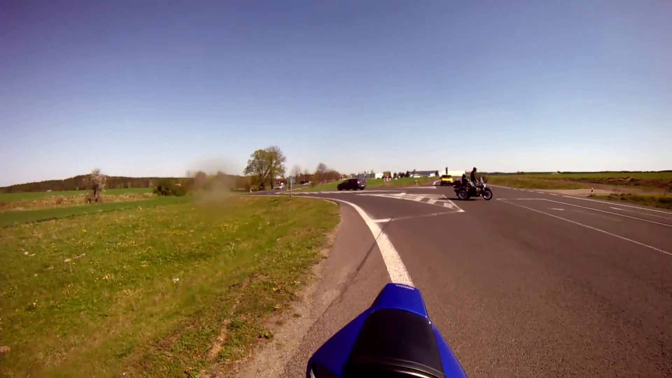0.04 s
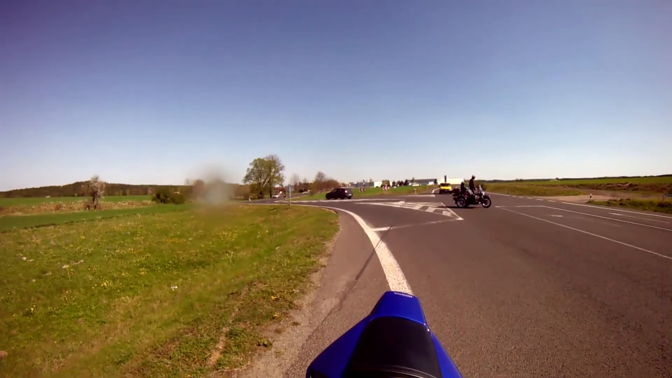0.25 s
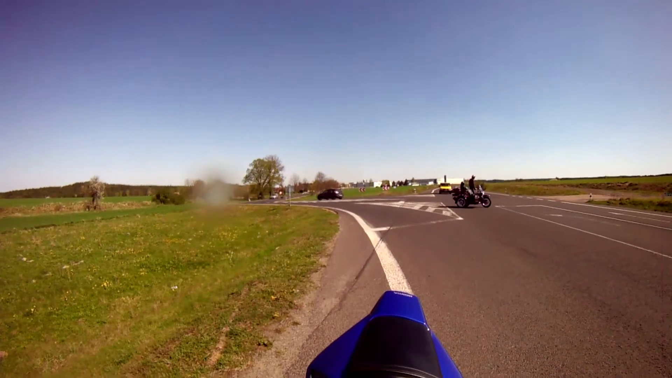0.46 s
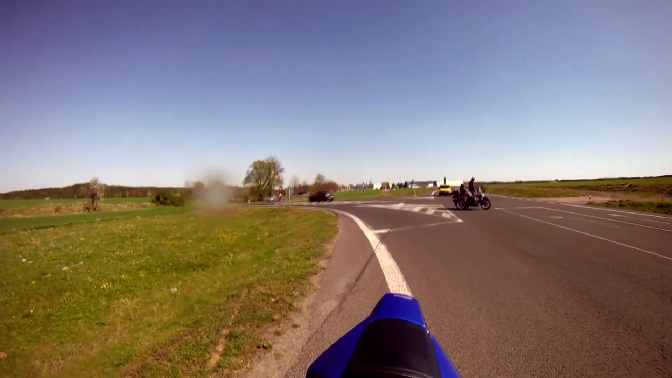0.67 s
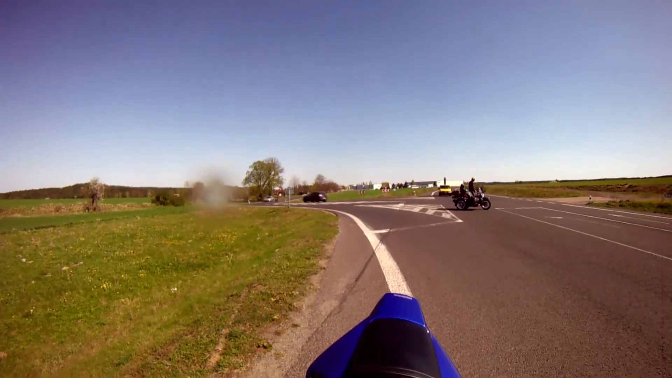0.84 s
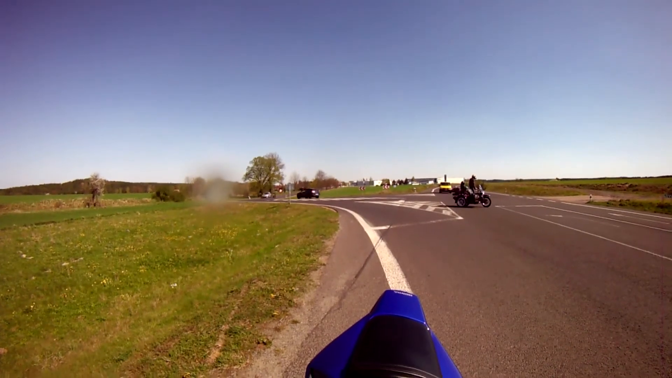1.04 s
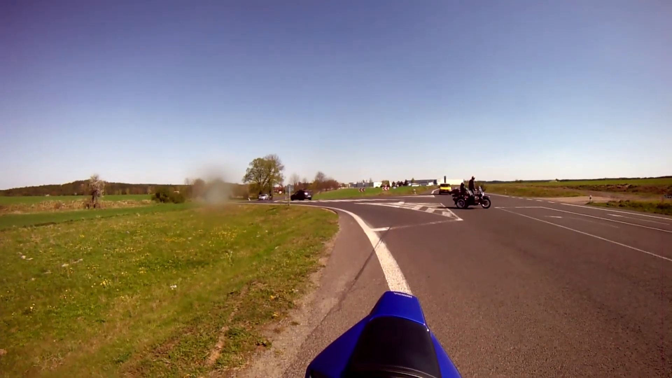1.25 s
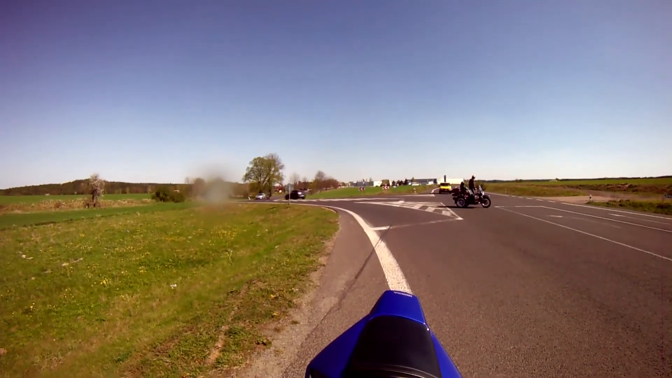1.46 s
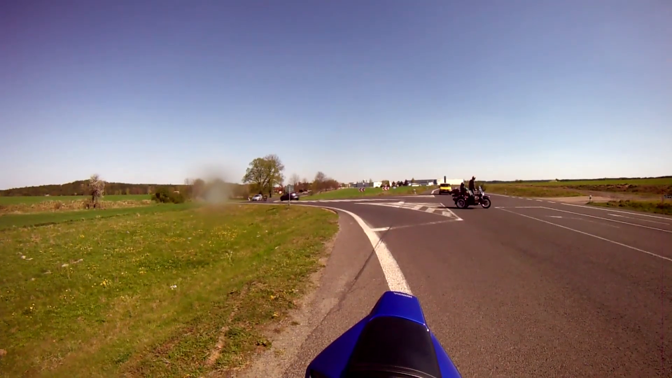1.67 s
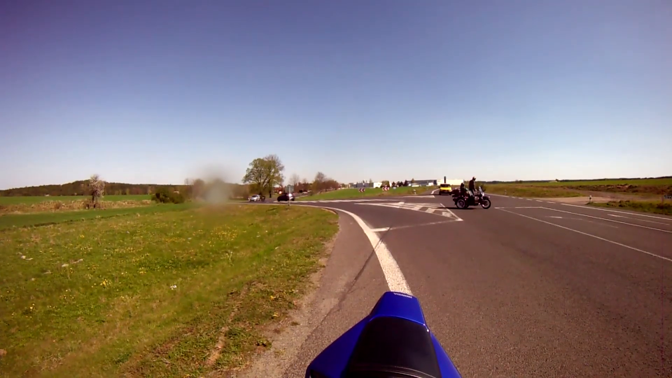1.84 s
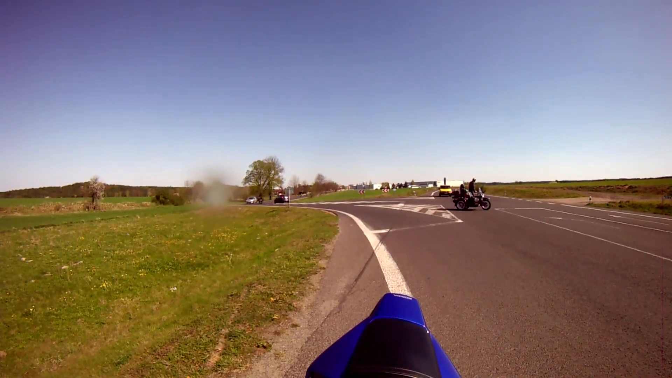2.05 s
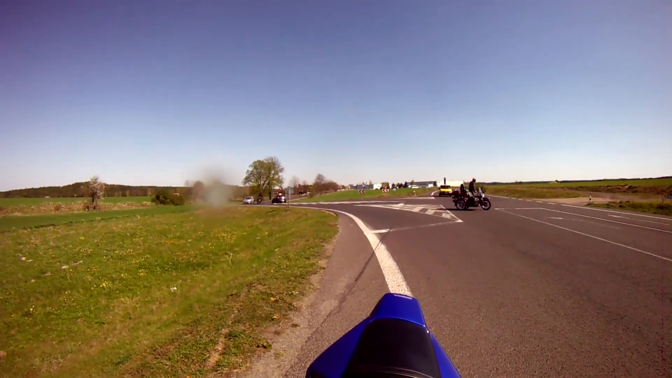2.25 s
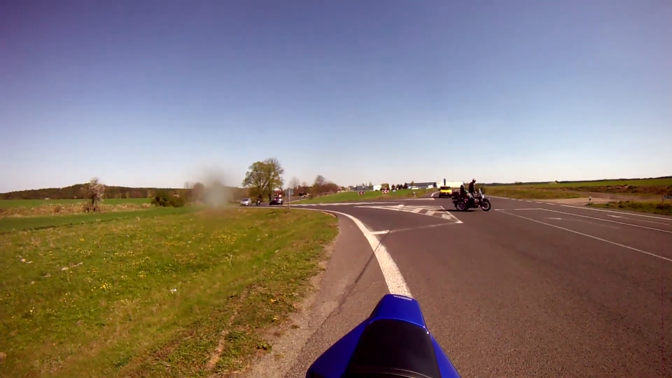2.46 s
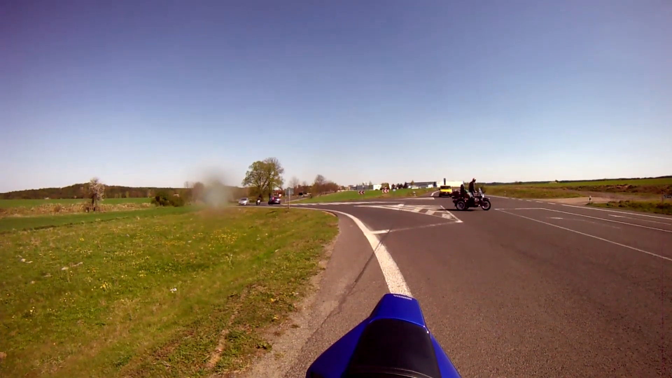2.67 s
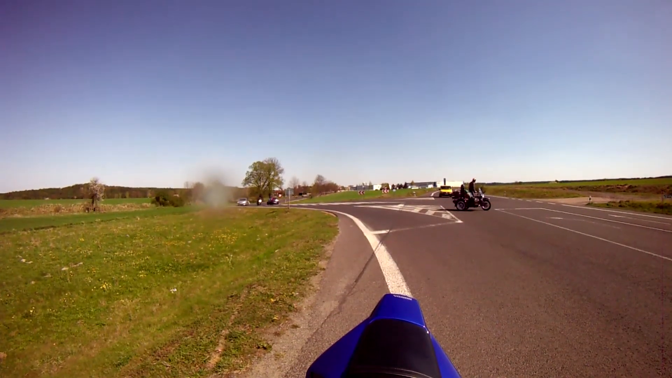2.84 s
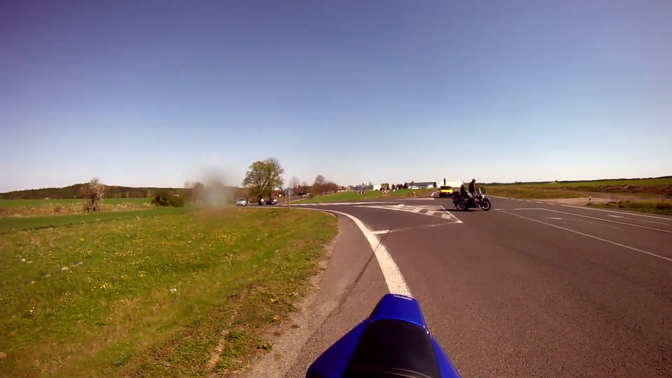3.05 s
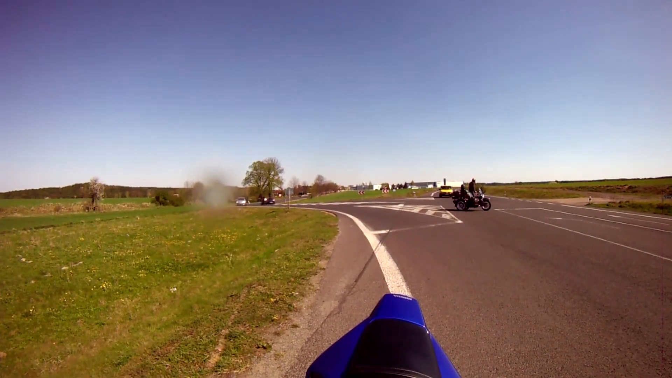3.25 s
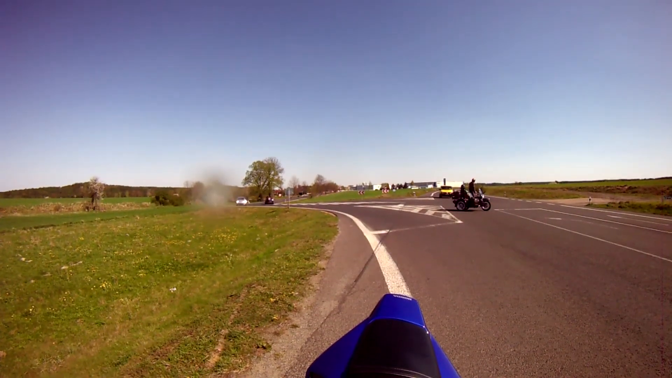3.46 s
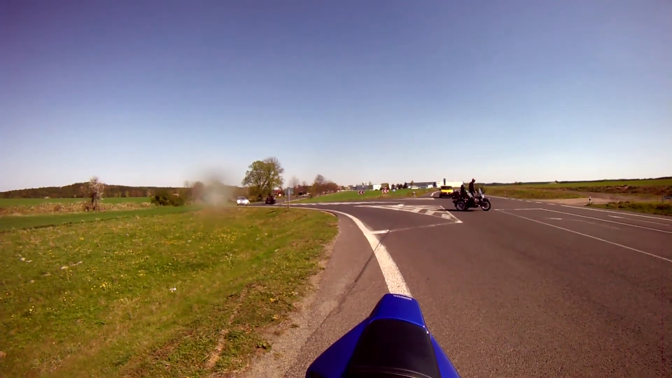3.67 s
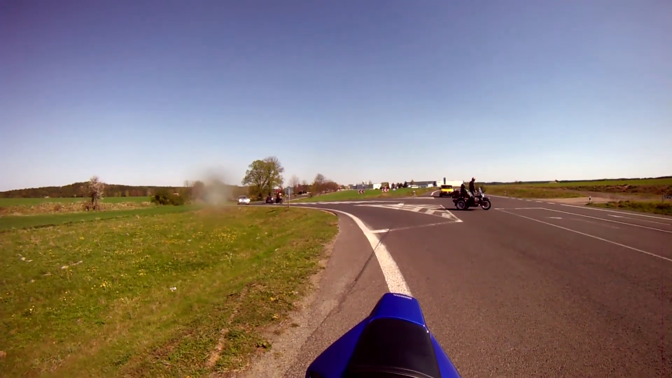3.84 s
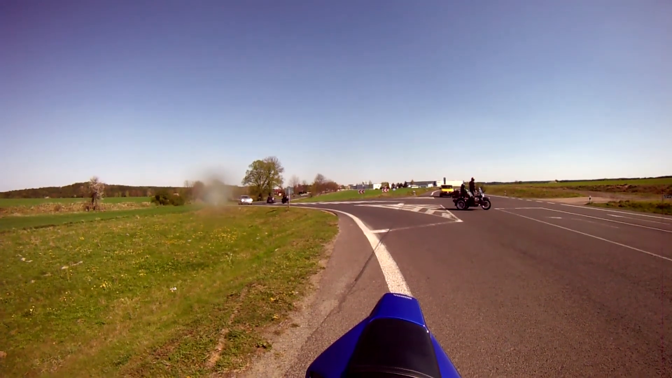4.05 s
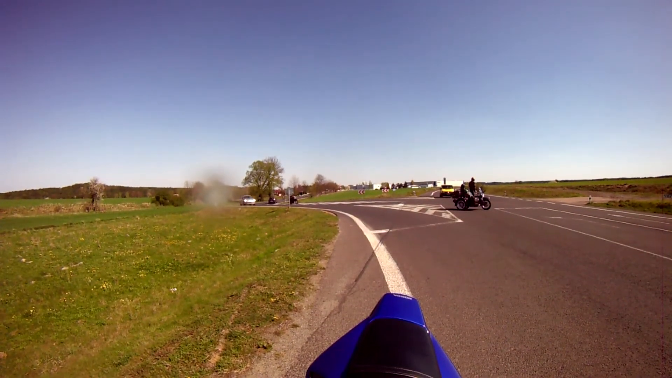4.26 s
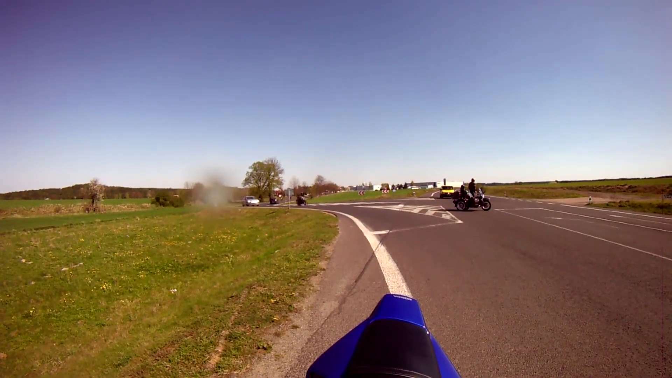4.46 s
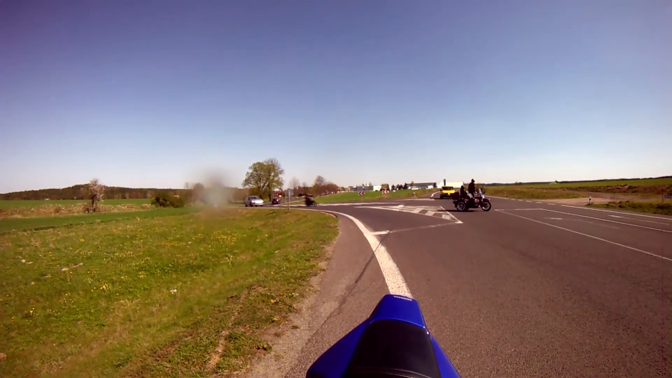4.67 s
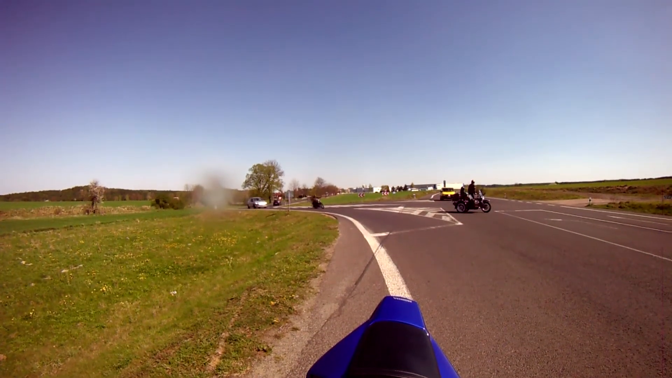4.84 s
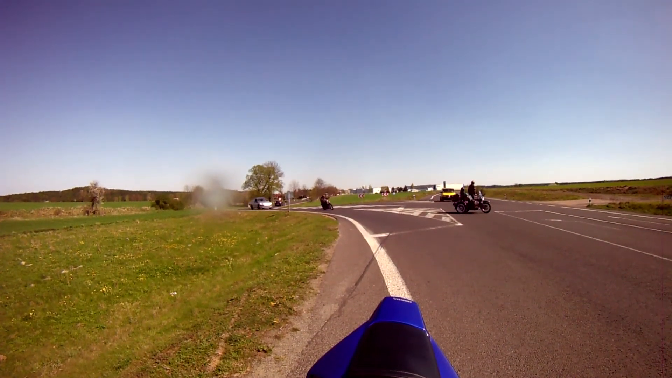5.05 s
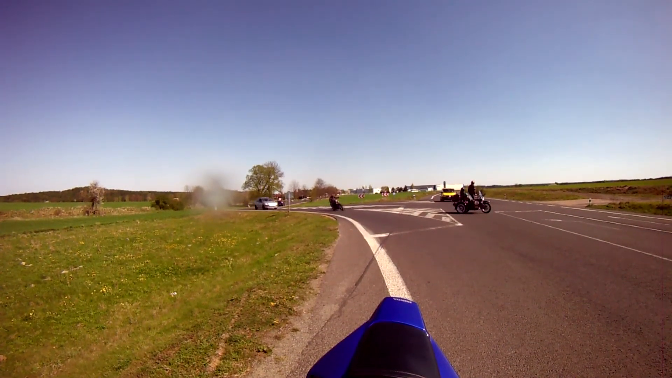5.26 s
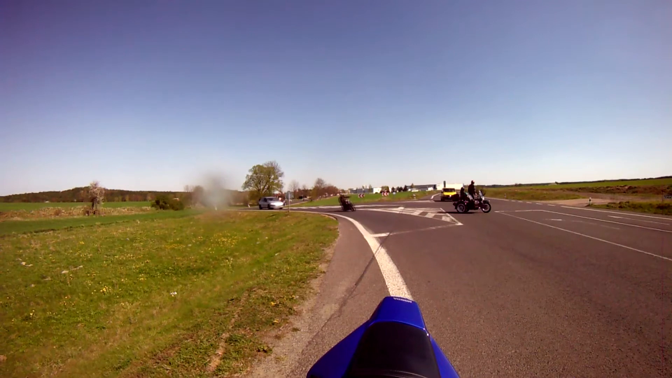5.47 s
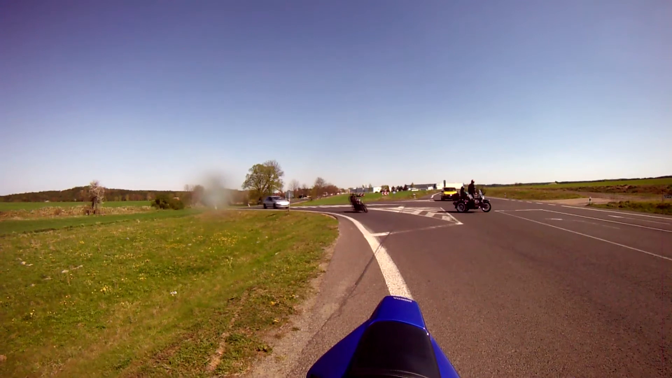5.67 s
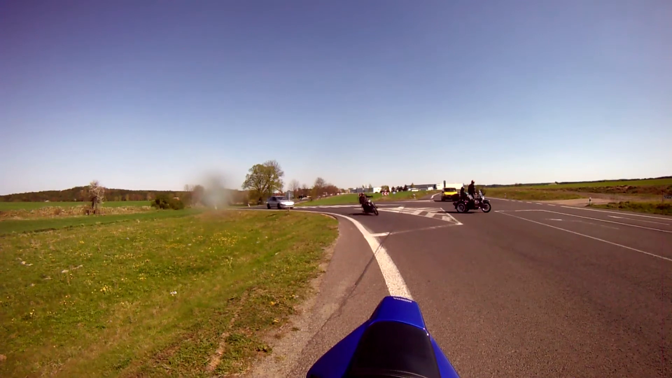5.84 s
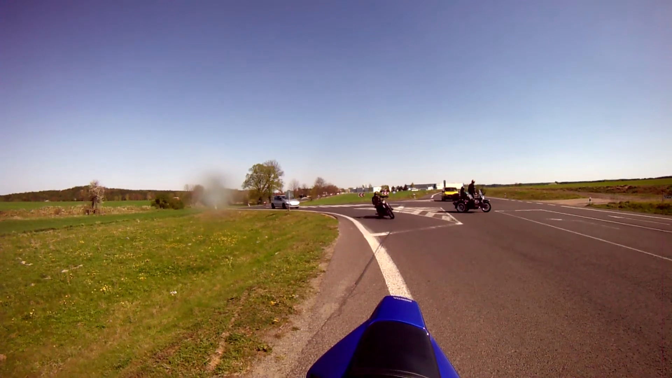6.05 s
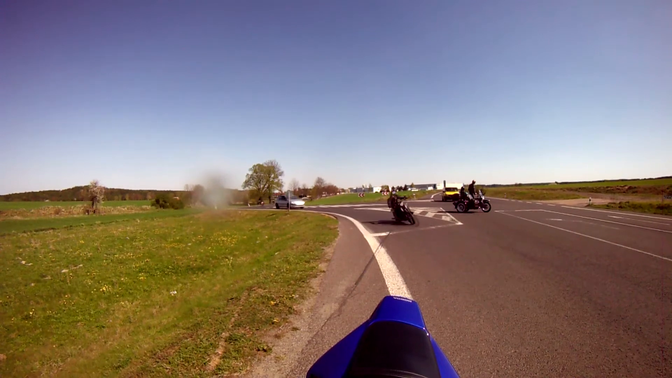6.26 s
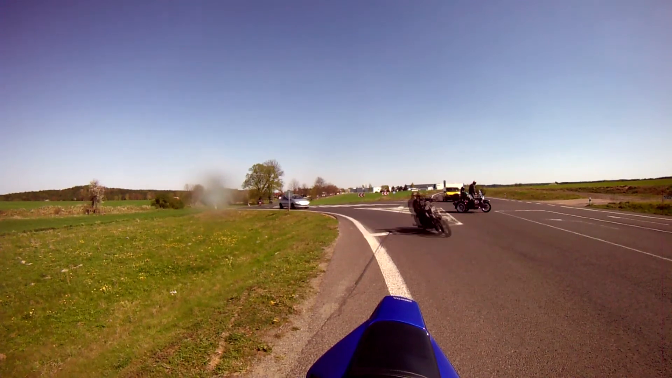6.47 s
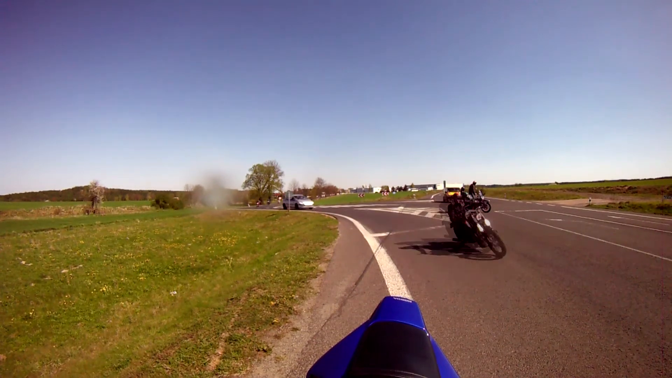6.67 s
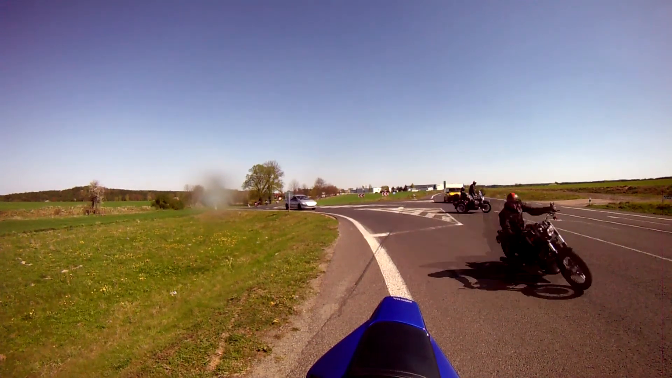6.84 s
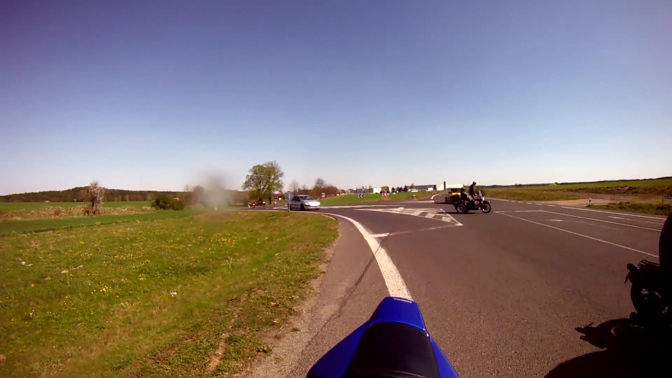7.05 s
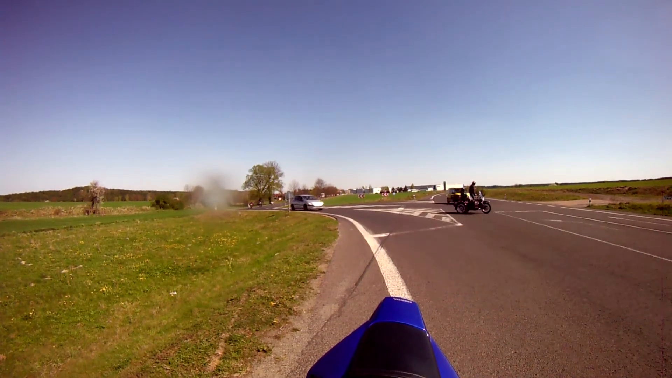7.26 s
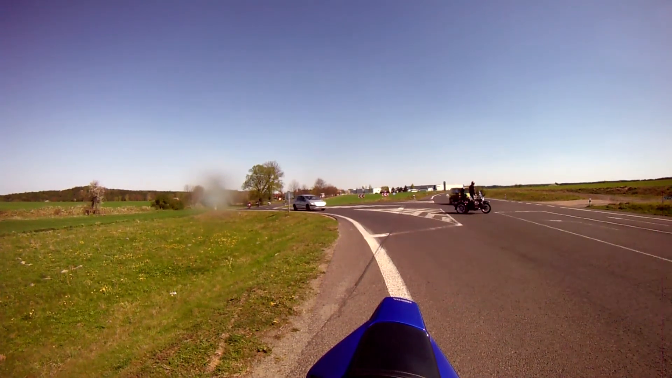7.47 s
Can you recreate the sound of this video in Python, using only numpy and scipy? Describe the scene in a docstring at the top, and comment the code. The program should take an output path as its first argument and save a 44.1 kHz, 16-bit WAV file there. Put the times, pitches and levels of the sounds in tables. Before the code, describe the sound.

Gusty wind thuds on the microphone as one bike fades away; another, deep and uneven, accelerates closer and thunders by in overload.

```python
"""A big V-twin accelerates out of a bend and passes close to a microphone case on a bike parked at the verge:
uneven beats of pressure pulses and gas bursts, ringing pipe, silencer and case, overload the microphone.
Before it, a four-cylinder recedes and shifts up: harmonics of its firing rate over chain and tyre hiss.
Wind buffets the case as gusting noise, grains tick on it as short bursts; far traffic is noise and a whine."""
import sys
import numpy as np
from scipy import signal
from scipy.fft import rfft, irfft, next_fast_len
from scipy.io import wavfile

SR = 44100
rng = np.random.default_rng(int(sys.argv[2]) if len(sys.argv) > 2 else 0)


def generate_wav(signal):
    """Clip the signal to [-1, 1] and save it as 16-bit WAV at the path in sys.argv[1]."""
    frames = np.transpose(np.atleast_2d(signal))
    scaled = np.clip(frames, -1, 1) * 32767
    pcm = np.round(scaled).astype(np.int16)
    wavfile.write(sys.argv[1], SR, pcm)


N = 331191
TIME = np.arange(N) / SR


def from_db(db):
    """Decibels to gain."""
    return 10 ** (np.asarray(db) / 20)


def rms_one(x):
    """Scale to unit power."""
    return x / np.sqrt(np.mean(x ** 2) + 1e-20)


def in_time(rows, at=TIME):
    """Interpolate each column of a curve at the given times."""
    time_s, *columns = np.transpose(rows)
    return [np.interp(at, time_s, column) for column in columns]


def noise(colour):
    """Unit-power noise shaped by (frequency [Hz], level [dB]) points, falling away beyond both ends."""
    hz, db = np.transpose(colour)
    size = next_fast_len(N)
    f = np.arange(size // 2 + 1) * SR / size + 1e-3
    gain = from_db(np.interp(np.log(f), np.log(hz), db))
    gain *= np.minimum(1, f / hz[0]) ** 2 * np.minimum(1, hz[-1] / f) ** 2
    spectrum = rfft(rng.standard_normal(size)) * gain
    return rms_one(irfft(spectrum, size)[:N])


def drift(rate_hz):
    """Random curve of unit RMS, linear between rate_hz new values per second."""
    return rms_one(np.interp(TIME * rate_hz, np.arange(4096), rng.standard_normal(4096)))


def cut(x, hz, kind, order=2):
    """Butterworth low- or high-pass."""
    sos = signal.butter(order, min(hz, .45 * SR), kind, fs=SR, output="sos")
    return signal.sosfilt(sos, x + 1e-18)


def resonate(x, hz, q):
    """Single resonance of unit peak gain."""
    return signal.lfilter(*signal.iirpeak(hz, q, fs=SR), x + 1e-18)


def place(times_s, shapes):
    """Add one short shape at each time."""
    out = np.zeros(N + shapes.shape[1])
    for time_s, shape in zip(times_s, shapes):
        i = min(round(time_s * SR), N)
        out[i:i + len(shape)] += shape
    return out[:N]


def bursts(times_s, db, decay_s, snap, size=900):
    """Each blow is a sudden front of height snap and a decaying turbulent tail."""
    age_s = np.arange(size) / SR
    shapes = rng.standard_normal((len(times_s), size)) * np.exp(-age_s / decay_s)
    shapes[:, 0] -= snap
    return place(times_s, shapes * from_db(db)[:, None])


# four-cylinder, one upshift: (time [s], firing rate [Hz], exhaust level [dB])
FOUR_CURVE = [(0, 147.9, -10.5), (.5, 162, -12.5), (.72, 166.9, -12.5), (1.0, 171.2, -22),
              (1.44, 179.2, -18.5), (1.55, 178.7, -36), (1.65, 155.1, -24.5), (1.8, 136.1, -24),
              (2.45, 144.1, -25), (3.0, 149.1, -28), (3.8, 157.9, -35), (4.4, 161.7, -39.5),
              (5.2, 165, -55.5)]
# exhaust partials: (multiple of firing rate [-], relative level [dB])
FOUR_PARTIALS = [(1, -1), (1.5, -30), (2, -12), (3, -15.5), (4, -39.5), (5, -48.5), (6, -53.5), (10, -35)]
# chain and tyre hiss: (time [s], level [dB])
HISS_LEVEL = [(0, -52.5), (.85, -52.5), (1.0, -57), (1.3, -60), (1.65, -68), (2.0, -83), (2.7, -90)]
# hiss spectrum: (frequency [Hz], relative level [dB per Hz])
HISS_SPECTRUM = [(1000, -16), (1700, -0.5), (2300, -24.5), (2800, -9), (3450, 9.5), (4050, -6), (4400, 4),
                 (4800, -0.5), (5300, 6.5), (6000, -20), (7100, -28), (7500, -23), (8200, -19.5),
                 (12000, -42.5)]


def four_cylinder(can_hz=715, can_width_hz=60, can_db=13):
    """Even firing gives harmonics, swelling at the can's resonance and dulling as it recedes; hiss beneath."""
    near_slope_db_per_oct, far_slope_db_per_oct, dulling_s = -2.5, -8, 0.29
    firing_hz, level_db = in_time(FOUR_CURVE)
    nearness = np.exp(-TIME / dulling_s)
    slope_db_per_oct = far_slope_db_per_oct + (near_slope_db_per_oct - far_slope_db_per_oct) * nearness
    phase = 2 * np.pi * np.cumsum(firing_hz * (1 + drift(9) / 1000)) / SR
    note = np.zeros(N)
    for k, partial_db in FOUR_PARTIALS:
        ring_db = can_db / (1 + ((k * firing_hz - can_hz) / can_width_hz) ** 2)
        dull_db = slope_db_per_oct * np.log2(min(k, 3))
        gain = from_db(level_db + partial_db + ring_db + dull_db + drift(4.3))
        note += gain * np.sqrt(2) * np.sin(k * phase + rng.uniform(0, 2 * np.pi))
    hiss_db, = in_time(HISS_LEVEL)
    return note + from_db(hiss_db) * noise(HISS_SPECTRUM)


# breeze between gusts: (time [s], strength [dB])
BREEZE_STRENGTH = [(0, 5.5), (.5, 4.5), (1.1, 4.5), (1.7, -1.5), (2.3, 1), (2.8, -3), (3.25, 2),
                   (3.68, -9.5), (4.2, -2.5), (4.9, 1), (5.25, 0), (5.6, -10.5)]
# gusts: (crest time [s], length [s], rise [dB], brightness [dB]; > 0 flutter of small eddies, < 0 low push)
GUST_LIST = [(.68, 0.27, 5.8, -3), (1.03, 0.13, 4.9, -0.5), (1.42, 0.051, 4.4, -2.5), (1.53, 0.13, 7.3, 10),
             (1.851, 0.11, 7, 7.5), (2.23, 0.083, 3.8, 0.5), (2.59, 0.16, 2.5, -2.5),
             (3.01, 0.054, 2.81, 0), (3.12, 0.092, 4.7, 2), (3.59, 0.055, 8.46, -1),
             (3.81, 0.057, 3.6, -2.5), (3.961, 0.024, 3.6, -4.5), (4.12, 0.31, 7.5, 4),
             (4.39, 0.23, 2.04, -1.5), (4.809, 0.19, 6.9, -4.5), (5.079, 0.17, 10, 3)]
# wind spectra, low to high: (frequency [Hz], relative level [dB per Hz])
RUMBLE_SPECTRUM = [(12, -6), (25, -5.5), (45, -0.5), (90, -1.5), (130, -3), (180, -9.5), (260, -24),
                   (500, -55.5)]
BUFFET_SPECTRUM = [(70, -17.5), (130, -1.5), (175, 2.5), (230, -1.5), (300, -11), (400, -30.5), (550, -50),
                   (900, -50.5)]
EDDY_SPECTRUM = [(200, -12.5), (330, 2.5), (450, -3.5), (620, -16), (900, -22.5), (1500, -45),
                 (3000, -62.5)]


def wind(flutter_hz=28):
    """Turbulent pressure on the case in three bands; gusts swell and die, brighter ones shed small eddies."""
    breeze_db, = in_time(BREEZE_STRENGTH)
    rise_db, bright_db = np.zeros(N), np.zeros(N)
    for crest_s, length_s, rise, bright in GUST_LIST:
        swell = np.exp(-(2 * (TIME - crest_s) / length_s) ** 2)
        rise_db += rise * swell
        bright_db += bright * swell
    # (base level [dB], gain per dB of breeze [dB/dB], flutter [dB], spectrum, gain per dB of brightness [dB/dB])
    layers = [(-22, 0.32, 2.2, RUMBLE_SPECTRUM, -1),
              (-27, 0.99, 1.8, BUFFET_SPECTRUM, 0),
              (-47.5, 2.28, 2.2, EDDY_SPECTRUM, 1)]
    out = np.zeros(N)
    for base_db, follows, flutter_db, spectrum, tilt in layers:
        level_db = base_db + follows * breeze_db + rise_db + tilt * bright_db
        out += from_db(level_db + flutter_db * drift(flutter_hz)) * noise(spectrum)
    return out


# far traffic: (time [s], level [dB])
TRAFFIC_LEVEL = [(0, -42.5), (1.6, -43), (2.2, -45), (2.8, -49.5), (3.5, -46.5), (4.1, -46.5), (4.6, -45.5)]
# traffic spectrum: (frequency [Hz], relative level [dB per Hz])
TRAFFIC_SPECTRUM = [(300, 7), (550, -12), (850, -11), (1150, -3), (1500, -1.5), (1900, -0.5), (2300, -12),
                    (2500, -15), (2900, -17), (3450, -18), (4000, -28.5), (5300, -28.5), (6000, -39),
                    (14000, -53)]
# thin far whine: (time [s], peak level before waver [dB])
WHINE_CURVE = [(0, -73), (1.5, -61.5), (2.5, -61.5), (4.0, -65), (5.0, -63)]


def traffic(whine_hz=2430):
    """Far tyre noise and a thin sine whine, wavering in level and pitch."""
    level_db, = in_time(TRAFFIC_LEVEL)
    tyres = from_db(level_db + 0.46 * drift(12)) * noise(TRAFFIC_SPECTRUM)
    whine_db, = in_time(WHINE_CURVE)
    whine_gain = from_db(whine_db + 2.4 * drift(30))
    phase = 2 * np.pi * np.cumsum(whine_hz + 14 * drift(60)) / SR
    return tyres + whine_gain * np.sin(phase)


# microphone hiss spectrum: (frequency [Hz], relative level [dB per Hz])
FLOOR_SPECTRUM = [(3000, 1), (7000, 0.48), (14000, -2)]


def microphone_hiss(level_db=-73.5):
    """The microphone's own steady noise."""
    return from_db(level_db) * noise(FLOOR_SPECTRUM)


# case resonances: (frequency [Hz], width [Hz], gain [dB])
CASE_RESONANCES = [(770, 660, -10), (1235, 286, 6.5), (1442, 442, 6), (1899, 334, 5), (2636, 153.3, -7.5),
                   (2865, 194, -10), (3520, 296, -12), (4090, 221, -13.5), (5390, 250, -24)]


def case_ring(x):
    """Parallel two-pole resonances of the case, alternating in sign."""
    out = np.zeros(N)
    for k, (hz, width_hz, db) in enumerate(CASE_RESONANCES):
        r = np.exp(-np.pi * width_hz / SR)
        b = [(1 - r * r) / 2, 0, (r * r - 1) / 2]
        a = [1, -2 * r * np.cos(2 * np.pi * hz / SR), r * r]
        out += (-1) ** k * from_db(db) * signal.lfilter(b, a, x + 1e-18)
    return out


# grains on the case: (time [s], blow strength before filtering [dB], top of contact spectrum [Hz])
GRAIN_TICKS = [(0.562, -10.5, 6500), (0.659, -12, 5500), (0.673, -21, 2500), (1.58, -17.5, 10100),
               (1.655, -13.5, 10100), (3.2815, -13.5, 2590), (3.3126, -13.5, 2560), (3.344, -18.5, 2410),
               (3.6165, -15, 6000), (4.0247, -19.5, 5000), (4.242, -13, 3530)]


def ticks(air_hz=6500):
    """Small hard grains strike the case, each blow limited to its own band, and set it ringing."""
    blows = np.zeros(N)
    for time_s, db, top_hz in GRAIN_TICKS:
        blow = bursts([time_s], [db], decay_s=0.0027, snap=2.5)
        blows += cut(cut(blow, top_hz, "low"), top_hz / 3, "high")
    return cut(case_ring(blows), air_hz, "low", order=4)


# V-twin opening up out of the bend: (time [s], throttle [dB])
THROTTLE_CURVE = [(4.5, -21.5), (5.1, -6), (5.45, 0), (5.8, 0), (6.4, 1.5), (7.5, 3)]


def approach_db(at_s, throttle_share=1):
    """V-twin gain: rises with throttle, falls with distance along a straight pass."""
    pass_s, gap_m, speed_m_per_s, doubling_loss_db = 7.181, 3.29, 16.13, 7.5
    distance_m = np.hypot(gap_m, speed_m_per_s * (at_s - pass_s))
    throttle_db, = in_time(THROTTLE_CURVE, at_s)
    return throttle_share * throttle_db - doubling_loss_db * np.log2(distance_m / gap_m)


def facing(far, near):
    """Blend from the far value to the near one as the V-twin's outlet swings past."""
    return far + (near - far) * np.interp(TIME, [6.3, 7.15], [0, 1])


# near bike's tyres, chain and valve gear: (frequency [Hz], relative level [dB per Hz])
RUSH_SPECTRUM = [(130, 22), (280, 24.5), (450, -0.5), (700, -0.5), (950, -8), (1300, 0), (1900, 5),
                 (2700, -14), (3400, -7), (4200, -16), (5300, -26.5), (6200, -27.5), (8500, -28.5),
                 (13000, -59)]


def rush(level_db=-12, clatter_db=3.5):
    """Noise of tyres, chain and valve gear, its level jittering rapidly."""
    arrived = np.interp(TIME, [3.8, 4.5], [0, 1])
    gain = from_db(level_db + approach_db(TIME) + clatter_db * drift(300))
    return arrived * gain * noise(RUSH_SPECTRUM)


# V-twin: (time [s], engine cycles [1/s], second cylinder's firing point [share of cycle])
TWIN_CURVE = [(4.565, 13.88, 0.45), (4.85, 14.34, 0.45), (5.2, 15.14, 0.444), (5.5, 15.89, 0.461),
              (5.8, 16.78, 0.451), (6.1, 17.63, 0.456), (6.4, 18.62, 0.449), (6.7, 19.66, 0.455),
              (7.0, 20.52, 0.456), (7.25, 20.22, 0.426), (7.51, 20.48, 0.406)]


def firings():
    """Unevenly spaced firing times [s] and a 0/1 flag for the second cylinder."""
    t = TIME[TIME >= TWIN_CURVE[0][0]]
    cycles_per_s, share = in_time(TWIN_CURVE, t)
    cycles = np.cumsum(cycles_per_s) / SR
    whole = np.arange(int(cycles[-1]) + 1)
    first_s = np.interp(whole, cycles, t)
    second_s = np.interp(whole, cycles - share, t)
    return np.concatenate([first_s, second_s]), np.repeat([0, 1], len(whole))


# exhaust pipe, quicker as the gas heats: (time [s], round trip [s])
PIPE_TRIP = [(4.5, 0.012), (5.6, 0.012), (6.4, 0.011), (7.0, .0104), (7.51, 0.01)]


def pipe(x, echo, dull_hz, count=4):
    """Pulses run up and down the exhaust pipe, weaker and duller at each return."""
    trip_s, = in_time(PIPE_TRIP)
    lag_s = 1 / (2 * np.pi * dull_hz)  # low-pass delay, part of the round trip
    out = x
    for _ in range(count):
        returned = np.interp(TIME - trip_s + lag_s, TIME, x)
        x = echo * cut(returned, dull_hz, "low", order=1)
        out = out + x
    return out


# silencer booms: (frequency [Hz], sharpness Q [-], far gain [-], gain with outlet facing the verge [-])
SILENCER_BOOMS = [(100, 3.1, 1, 0.28), (191.2, 2.65, 0.14, 0.72), (291, 2.96, -0.4, 0.71)]


def thumps(level_db=11.5, throttle_share=0.56, second_db=-1.0, size=1100):
    """Each beat pushes out a low pressure pulse that echoes in the pipe and booms in the silencer."""
    swell_s, dip, dip_s, lead_s = 0.0023, 0.92, 0.0012, 0.0033
    times_s, is_second = firings()
    strength_db = 0.6 * rng.standard_normal(len(times_s))
    stretch = np.exp(0.04 * rng.standard_normal((len(times_s), 1)))
    age_s = np.arange(size) / SR - lead_s
    # pressure dips briefly, then swells and dies
    since = np.maximum(age_s - .0009, 0) / (swell_s * stretch)
    shapes = since * np.exp(1 - since) - dip * np.exp(-((age_s - .0003) / dip_s) ** 2)
    beat_db = level_db + approach_db(times_s, throttle_share) + is_second * second_db + strength_db
    pulses = place(times_s - lead_s, from_db(beat_db)[:, None] * shapes)
    pulses = pipe(pulses, echo=0.52, dull_hz=364)
    out = pulses
    for hz, q, far, near in SILENCER_BOOMS:
        out = out + facing(far, near) * resonate(pulses, hz, q)
    return cut(cut(out, 67.6, "high", order=1), 41, "high", order=1)


def cracks(level_db=18, second_db=-2.5, lead_s=0.00019, air_hz=7000, edge_db=-6):
    """Gas bursts from the valve at each beat and rings the case: lower bark far off, sharper edge close by."""
    bark_hz, bark_q, bark_far, bark_near = 1220, 5, 0.56, -0.53
    times_s, is_second = firings()
    beat_db = level_db + approach_db(times_s) + is_second * second_db
    blows = bursts(times_s - lead_s, beat_db, decay_s=0.0031, snap=7.22)
    rung = case_ring(pipe(blows, echo=0.11, dull_hz=1900, count=1))
    bark = facing(bark_far, bark_near) * resonate(rung, bark_hz, bark_q)
    edge = from_db(edge_db) * facing(0, 1) * cut(rung, air_hz, "high")
    return cut(rung + bark, air_hz, "low", order=6) + edge


def v_twin():
    """Uneven exhaust beats over the rush of tyres, chain and valve gear."""
    return rush() + thumps() + cracks()


def scene():
    """Both bikes, wind, grains and road at one microphone."""
    background = wind() + traffic() + microphone_hiss()
    return (four_cylinder() + background + ticks() + v_twin())[None]


def record(dry, knee=17.0, cutoff_hz=14200):
    """Microphone overload: flat tops, rounded shoulders; lowest bass and top treble are cut."""
    bottom, top = -.75, .72  # clipping limits, full scale = 1
    faded_in = dry * np.minimum(TIME / .004, 1)
    fine = signal.resample_poly(faded_in, 2, 1, axis=-1)  # oversampled against aliasing
    drive = np.maximum(fine / bottom, fine / top)
    flat = fine / (1 + drive ** knee) ** (1 / knee)
    out = cut(signal.resample_poly(flat, 1, 2, axis=-1), .4, "high", order=1)
    return signal.sosfiltfilt(signal.ellip(6, .05, 45, cutoff_hz, fs=SR, output="sos"), out)


dry = scene()
out = record(dry)
generate_wav(out)
```